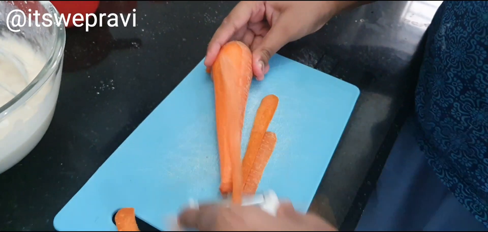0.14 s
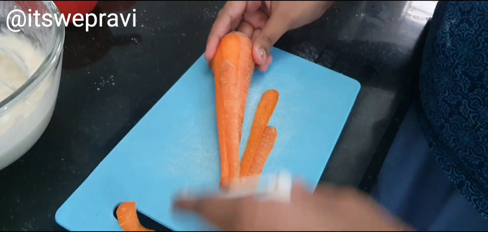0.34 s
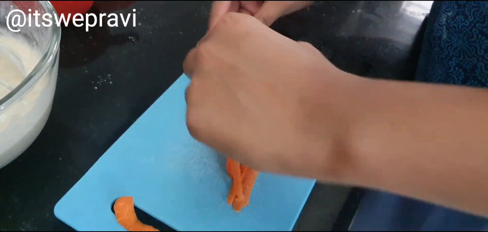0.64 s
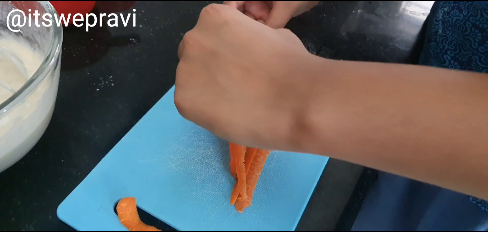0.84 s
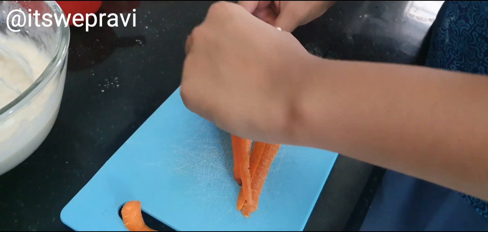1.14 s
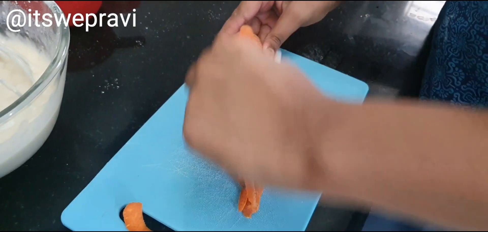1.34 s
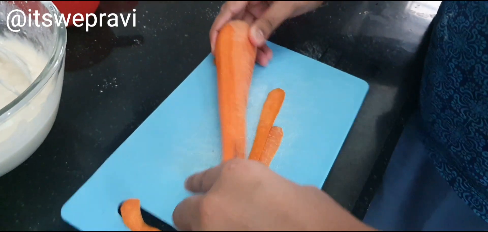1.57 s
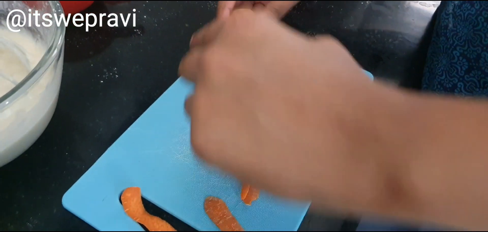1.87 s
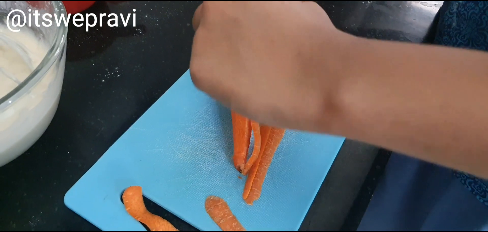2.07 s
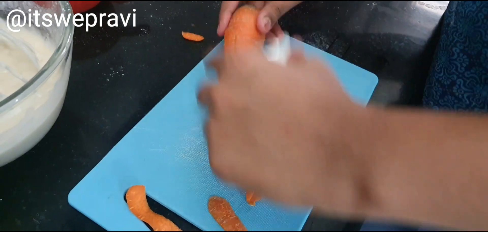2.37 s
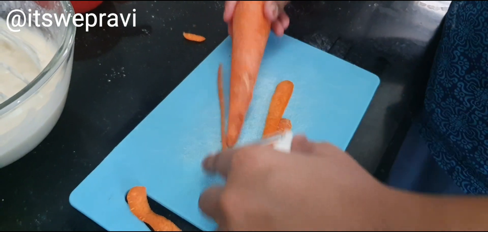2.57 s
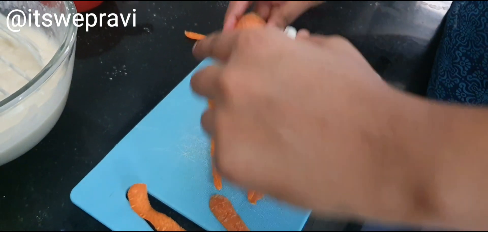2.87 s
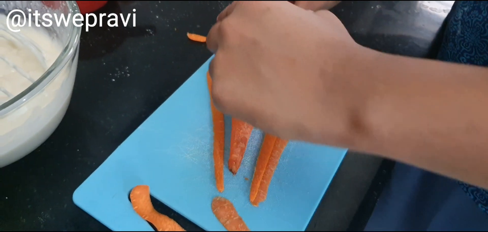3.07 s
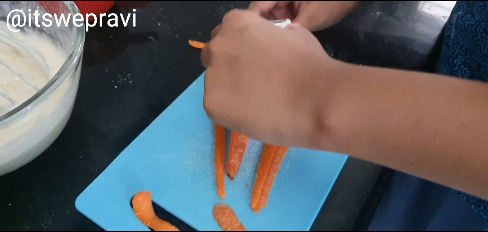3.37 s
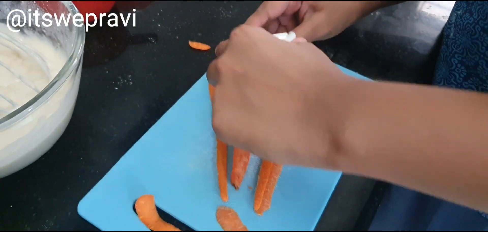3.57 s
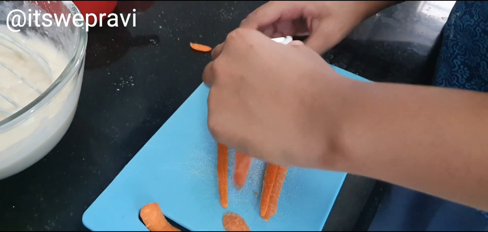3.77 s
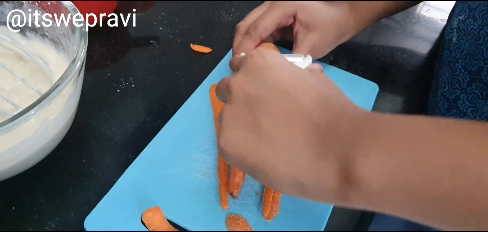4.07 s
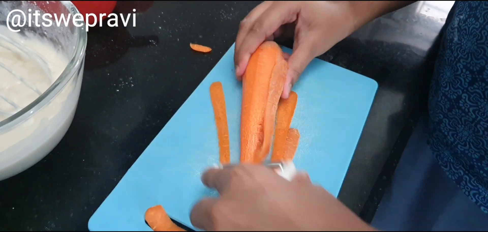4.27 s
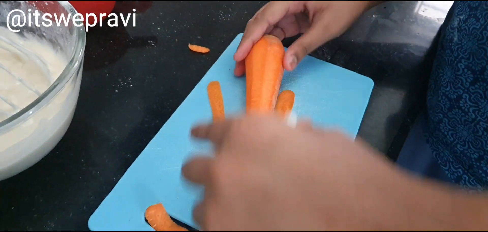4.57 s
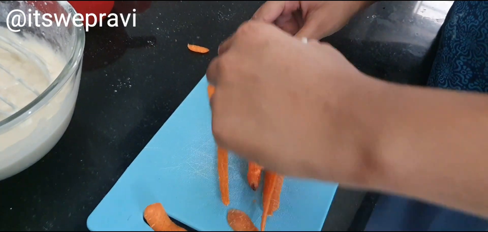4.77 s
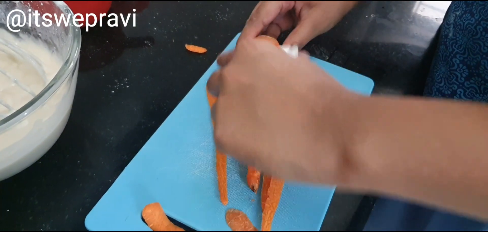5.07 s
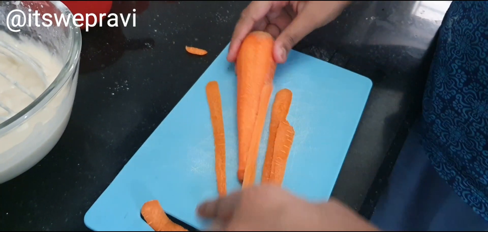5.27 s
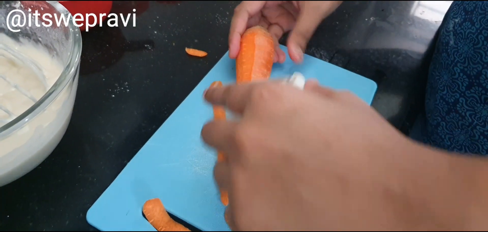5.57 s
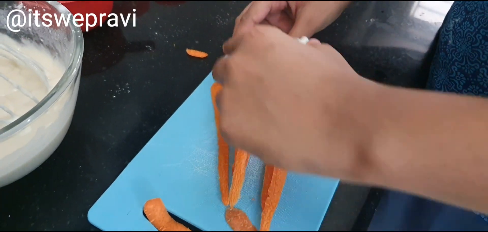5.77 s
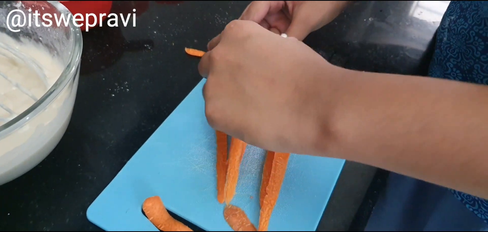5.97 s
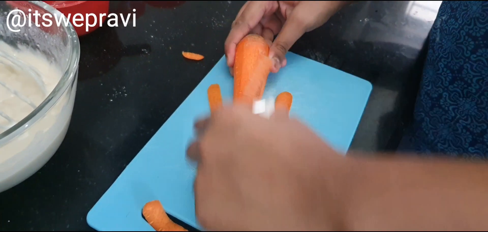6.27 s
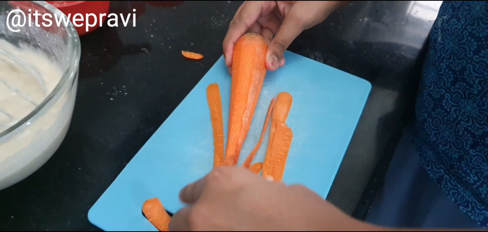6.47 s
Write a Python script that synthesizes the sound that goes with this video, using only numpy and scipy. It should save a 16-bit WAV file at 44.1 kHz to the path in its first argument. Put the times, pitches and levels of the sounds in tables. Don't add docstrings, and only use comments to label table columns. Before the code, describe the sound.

Close stereo pickup in a hard-surfaced kitchen with short, bright echo. A peeling stroke is already under way at 0 s, a crisp fibrous rasp that ends by 0.3 s in sharp edge catches and a skid on the plastic board. Metallic clacks of the loose blade cluster at 0.7-1.05 s. A second stroke swells from 1.2 to 1.55 s and scrapes off the tip until about 1.7 s. Small rattles, shifts and a dull bump fill 2.15-2.65 s; sparse clicks follow at 3.2-3.5 s, then very faint hand brushing to 3.9 s. A third rasp at 4.1-4.35 s finishes with hard snaps and a skid. Strong clacks at 4.92-4.95 s lead to a fourth stroke at 5.0-5.25 s, ending in a bright knock. Clacks at 5.9 s precede the last stroke, 6.15-6.4 s, and its brief skid. Faint creaks, wavering low rumble and hiss lie underneath.

```python
import sys
import numpy as np
from scipy import signal
from scipy.fft import rfft, irfft, next_fast_len
from scipy.io import wavfile
from scipy.ndimage import uniform_filter1d

SR = 44100
rng = np.random.default_rng(int(sys.argv[2]) if len(sys.argv) > 2 else 0)


def to_wav(sig):
    pcm = np.clip(np.atleast_2d(sig), -1, 1) * 32767
    pcm = np.round(pcm).astype(np.int16)
    wavfile.write(sys.argv[1], SR, pcm.T)


def to_linear_factor(level_db):
    exponent = np.asarray(level_db, float) / 20
    return 10 ** exponent


N = 292383

# (frequency [Hz], density [dB per Hz])
HISS_SPECTRUM = [(71, -31), (120, -4.5), (226, -12.5), (284, -12), (355, -14.5), (418, -16), (445, -15.5),
                 (684, -22.5), (1030, -30.5), (1430, -33.5), (1520, -33), (6630, -45), (7980, -32),
                 (10400, -49), (16000, -51.5)]
# (frequency [Hz], likeness [0-1])
HISS_LIKENESS = [(60, 0.74), (240, 0.85), (950, 0.28), (3770, 0.2), (15000, 0.4)]
# (time [s], level [dB])
RUMBLE_SWELL = [(0.0, -37), (0.03, -39.5), (1.02, -50), (1.46, -40.5), (1.73, -49.5), (3.21, -55.5),
                (3.25, -46.5), (3.78, -54), (4.21, -41.5), (4.56, -53.5), (5.22, -45), (5.28, -55),
                (5.69, -59), (5.72, -43), (6.02, -39.5), (6.15, -54), (6.26, -39), (6.63, -53.5)]
# (frequency [Hz], level [dB])
HOUSE_TONES = [(140, -67.5), (286, -63), (331, -65.5)]
# (frequency [Hz], time to fall 60 dB [s])
KITCHEN_DECAY = [(200, 1), (1000, 0.46), (3000, 0.59), (6000, 0.55), (12000, 0.38)]
# (frequency [Hz], gain [dB])
PORT_COLOUR = [(60, 5), (150, 2.5), (380, -2.5), (950, 2), (2380, 8.5), (5980, -3), (15000, -3)]
# (frequency [Hz], level [dB])
PORT_SPREAD = [(300, -19.5), (1000, -7), (3000, -5), (6000, 0.5), (12000, -3)]

# (frequency [Hz], width [Hz], level rubbed [dB], level knocked [dB])
RUMBLE_MODES = [(65, 8.9, -16.5, 0), (78.4, 15, 6, 4)]
THUD_MODES = [(140, 9, 1, 0), (310, 72, -7.5, 0)]
SKID_MODES = [(1230, 450, -1.1, 0), (2250, 400, -1.9, 0)]
BOARD_MODES = [(648, 180, -3, -5.5), (1096, 480, -4, -3.5), (1235, 120, -3.5, -2), (1736, 290, 0.5, -1),
               (2006, 251, 2.5, -9.5), (2237, 540, -2.5, -9.5)]
BLADE_MODES = [(2708, 144, -2.5, -3.5), (2892, 189, -1, -0.5), (3567, 500, -7, -5.5), (3865, 770, -9, -7.5)]
PIVOT_MODES = [(4526, 449, -1, -8.5), (4957, 310, 0, -5), (5325, 380, -3, -1.5), (6200, 1300, -10.5, -11)]
EDGE_MODES = [(6800, 700, -10, 1.5), (8680, 600, -7.5, 2.5), (9800, 440, -1.5, 2), (11100, 740, -0.5, -0.5),
              (12740, 760, -11, -9), (14640, 620, -9.5, -8.5), (14000, 800, -17.5, -9.5)]
GRIP_SHIFT = [2.4, 1.5, 2.8, 3.8]

# (time [s], level [dB], length [s])
BUMP_EVENTS = [(2.35, -43, 0.025), (.11, -40.5, 0.028), (5.05, -46.5, 0.027)]
# (start [s], end [s], frequency [Hz], level [dB])
CREAK_EVENTS = [(.12, 0.365, 424, -45.5), (1.434, 1.522, 310, -33.5), (2.471, 2.577, 695, -46.5),
                (4.421, 4.526, 588, -44), (5.309, 5.401, 547, -57)]
# (start [s], length [s], blade [dB], loss by the end [dB], board re blade [dB])
HAND_BRUSHES = [
    (3.55, .15, -63, 1.8, -5),
    (3.7, 0.052, -71.5, 9, 0),
    (3.81, .115, -58.5, 3.4, -2.5),
]
# (start [s], length [s], blade [dB], loss [dB], board re blade [dB])
BLADE_SHIFTS = [(.709, 0.056, -37, -3, -9.5), (.783, 0.11, -42.5, 18.5, -4), (.953, .047, -46, 31.5, -7),
                (1.029, 0.1, -30.5, 25, -17), (2.157, 0.097, -59, 18, -2), (2.325, 0.092, -48, .6, -2),
                (2.423, 0.024, -25.5, 11, -11.5), (2.449, 0.11, -42, 4, -14),
                (2.575, 0.033, -41, -10.5, -2.5), (2.615, 0.046, -33, 21.5, -4.5),
                (3.2, 0.031, -73, -7, -13), (3.228, 0.089, -35, 33, -18), (3.44, 0.048, -60, -30, -8),
                (3.48, 0.067, -34.5, 29, -5), (3.93, 0.062, -39.5, 12, 1), (3.996, 0.08, -48, -3, -4.5),
                (4.923, 0.11, -40, 3, -8), (5.6, 0.055, -63.5, 7.5, 0.5), (5.902, 0.039, -41, -6, -28),
                (5.93, 0.18, -36, 32.5, -12)]
# (start [s], length [s], blade [dB], loss [dB], board re blade [dB])
BLADE_SKIDS = [(.1, 0.12, -22, 3, 4), (.224, 0.048, -29, 18, -1), (1.55, 0.17, -35.5, 2.1, 3),
               (1.635, 0.089, -44, 27.5, 1.7), (4.35, 0.078, -30, -1.5, 6), (4.44, 0.045, -29, 26.5, -7),
               (5.228, 0.015, -37, -8, -1), (5.248, 0.054, -22.5, 24, -8.5), (6.417, 0.13, -29, 40, 4)]
# (start [s], fullest [s], end [s], blade at fullest [dB], loss by the end [dB])
PEEL_STROKES = [
    (-.06, 0.063, .1, -25, -4.5),
    (1.211, 1.425, 1.548, -23, 22.5),
    (4.088, 4.257, 4.348, -25.5, 12),
    (5.014, 5.124, 5.226, -27.5, 11.5),
    (6.145, 6.31, 6.417, -26, 7.5),
]
# (time [s], length [s], loss [dB])
BLADE_STALLS = [(0.131, 0.019, 4.5), (0.159, 0.01, 3), (1.387, 0.024, 3.5), (4.375, 0.029, 3)]
# (time [s], blade peak [dB], pivot re blade [dB])
BLADE_CLACKS = [(0.7088, -16.5, 9), (0.7358, -18, -8), (0.759, -18, 6.5), (0.7651, -19.5, 8),
                (0.7842, -20.5, 8.5), (0.954, -36.5, 7), (1.024, -23.5, 11), (1.0287, -17, -7),
                (1.0358, -10, 1.5), (1.5853, -14, 2.5), (2.3263, -40, -8), (2.3449, -22, 2.5),
                (2.3652, -27.5, 7), (2.395, -51, 23), (2.4198, -34, 12), (2.4231, -18, 11.5),
                (2.427, -22, 7), (2.429, -23.5, 14.5), (3.2068, -35.5, -5), (3.228, -28, 14.5),
                (3.248, -20, -10), (3.9292, -23, -2), (3.9635, -29, 2), (4.9234, -18, 2.5),
                (4.9332, -13, 7), (4.9491, -9.5, 2), (5.2484, -8.5, 6.5), (5.9018, -22, 0),
                (5.9055, -12.5, 7), (6.5343, -30.5, 8)]
# (time [s], blade peak [dB], board re blade [dB])
EDGE_CATCHES = [(0.099, -19, 6), (0.1379, -5, -13.5), (0.17, -11, -3), (0.1987, -10.5, -7.5),
                (0.2086, -8.5, -8.5), (.7729, -19.5, -2), (1.2093, -26, -2), (1.2368, -30, -11),
                (1.5617, -20.5, 2), (1.6066, -16.5, -6), (2.159, -41, -14), (2.5705, -33, 6),
                (2.583, -20.5, -14), (2.618, -22, -18), (3.46, -31.5, -6), (3.48, -30, -2),
                (4.11, -27.5, 0.5), (4.364, -19, -4), (4.376, -6, -5), (4.3846, -11.5, -17.5),
                (4.4134, -10, -22), (4.4428, -16, -13), (5.0478, -22.5, -3), (5.228, -28, -16.5),
                (5.2423, -24.5, 14), (6.1548, -37, -3), (6.3753, -26.5, 10)]
# (time [s], blade peak [dB])
LIGHT_TAPS = [(0.996, -47), (2.3146, -47), (2.603, -23.5), (3.1756, -54), (3.897, -35), (4.0421, -33.5),
              (4.0904, -27), (4.355, -21.5), (6.3537, -20), (6.4272, -19.5)]


def rms_one(x):
    return x / np.sqrt(np.mean(x ** 2) + 1e-20)


def at_hz(points, hz):
    p = np.array(points, float)
    return np.interp(np.log(np.maximum(hz, 1)), np.log(np.maximum(p[:, 0], 1)), p[:, 1])


def bandpass(x, low_hz, high_hz):
    return signal.sosfilt(signal.butter(2, [low_hz, high_hz], "band", fs=SR, output="sos"), x)


def drift(rate_hz):
    r = np.exp(-16 * np.pi * rate_hz / SR)
    noise = rng.standard_normal(N // 8 + 4002)
    slow = rms_one(signal.lfilter([1], [1, -2 * r, r * r], noise)[4000:])
    return np.interp(np.arange(N) / 8, np.arange(len(slow)), slow)


def tone(hz, wander_hz):
    return np.sqrt(2) * np.sin(2 * np.pi * np.cumsum(hz + wander_hz * drift(3.0)) / SR)


def resonate(rub, modes, patchy_db, knock=0):
    out, reply = 0, 0
    click = np.arange(SR // 2) == 0
    for k, (hz, width_hz, rub_db, knock_db) in enumerate(modes):
        r = np.exp(-np.pi * max(width_hz, 5) / SR)
        b = (-1) ** k * (1 - r * r) * np.array([1, 0, -1])
        a = [1, -2 * r * np.cos(2 * np.pi * hz / SR), r * r]
        shift_db = patchy_db * drift(10.9) if patchy_db else 0
        force = rub * to_linear_factor(rub_db + shift_db) + knock * to_linear_factor(knock_db)
        out = out + signal.lfilter(b, a, force + 1e-18)
        reply = reply + to_linear_factor(rub_db) * signal.lfilter(b, a, click)
    return out / np.sqrt(np.sum(reply ** 2))


def hiss():
    hz = np.arange(N // 2 + 1) * SR / N
    alike = np.clip(at_hz(HISS_LIKENESS, hz), 0, 1)
    colour = to_linear_factor(at_hz(HISS_SPECTRUM, np.maximum(hz, 130)))
    mid, side = rfft(rng.standard_normal((2, N))) * colour
    both = np.sqrt(1 + alike) * mid + np.sqrt(1 - alike) * side * [[1], [-1]]
    both = both / np.sqrt(1 + (90 / (hz + 1)) ** 6)
    return to_linear_factor(-52.5) * rms_one(irfft(both, N))


def house_rumble():
    mid, side = resonate(rng.standard_normal((2, N)), RUMBLE_MODES, patchy_db=2.0)
    mid, side = bandpass([mid, side], 45, 130)
    mid = rms_one(mid / uniform_filter1d(mid ** 2 + 1e-9, size=4000) ** 0.84)
    mid = mid + to_linear_factor(-1.5 + 2.2 * drift(4.6)) * tone(79.9, wander_hz=2.5)
    swell = to_linear_factor(np.interp(np.arange(N) / SR, *np.transpose(RUMBLE_SWELL)))
    return swell * rms_one(mid + .25 * side * np.array([[1], [-1]]))


def house_tones():
    tones = sum(to_linear_factor(db + 2.2 * drift(2.8)) * tone(hz, 3.0) for hz, db in HOUSE_TONES)
    air = bandpass(rng.standard_normal((2, N)), 18, 45)
    return tones + to_linear_factor(-70) * rms_one(air)


def room_noise():
    return (house_tones() + house_rumble() + hiss()) * to_linear_factor([[.8], [-.8]])


def kitchen(x):
    t = np.arange(int(.8 * SR)) / SR
    edges = 100 * 2 ** np.arange(0, 7.6, .5)
    tail = 0
    white = rng.standard_normal((2, 2, len(t)))
    for k, (low, high) in enumerate(zip(edges, edges[1:])):
        decay = to_linear_factor(-60 * t / at_hz(KITCHEN_DECAY, np.sqrt(low * high)))
        tail = tail + bandpass(white[k % 2], low, high) * decay
    tail = tail + to_linear_factor(13.5) * white[0] * np.exp(-t / 0.017)
    tail = tail * np.clip(t / 0.00081, 0, 1)
    return signal.fftconvolve(x[None], tail / np.sqrt(np.sum(tail ** 2) / 2), axes=1)[:, :N]


def ports(pair, pan_db):
    size = next_fast_len(N + 4096)
    hz = np.arange(size // 2 + 1) * SR / size
    lag_s = 5e-5
    shared, own = rfft(pair, size)
    own = own * to_linear_factor(at_hz(PORT_SPREAD, hz))
    half = to_linear_factor(at_hz(PORT_COLOUR, hz) / 2) * np.exp(1j * np.pi * hz * lag_s)
    place = to_linear_factor((uniform_filter1d(pan_db, size=200) - 1.5) / 2)
    left = irfft((shared + own) * half, size)[:N] * place
    right = irfft((shared - own) / half, size)[:N] / place
    return np.array([left, right])


def bumps():
    t = np.arange(N) / SR
    swell = sum(to_linear_factor(db) * np.exp(-((t - s) / length) ** 2) for s, db, length in BUMP_EVENTS)
    return swell * rms_one(bandpass(rng.standard_normal(N), 110, 380))


def creaks():
    out = np.zeros(N)
    for start, end, hz, level_db in CREAK_EVENTS:
        swell = np.hanning(int((end - start) * SR)) ** .5
        rub = swell * rng.standard_normal(len(swell))
        ring = resonate(rub, [(hz, 35, 0, 0)], patchy_db=0)
        out[int(start * SR):int(start * SR) + len(swell)] += to_linear_factor(level_db) * ring
    return out


def board_thud(board_push):
    pressure = np.abs(uniform_filter1d(board_push, size=1500)) ** 0.51
    return to_linear_factor(-27.0) * resonate(pressure * rng.standard_normal(N), THUD_MODES, patchy_db=3.0)


def plastic_skid(slide, fibres):
    on_board = np.clip(slide[0] / (slide[1] + 1e-9), 0, 3.0)
    return to_linear_factor(-9) * resonate(slide[0] * on_board * fibres, SKID_MODES, patchy_db=-1.0)


def contact(start, length):
    on = np.arange(max(int(start * SR), 0), min(int((start + length) * SR), N))
    return on, (on / SR - start) / length


def strokes():
    push, pan_db = np.zeros((4, N)), np.zeros(N)

    def add(on, blade_db, board_db, edge_db, side_db):
        fade = np.clip((on[-1] - on) / SR / .002, 0, 1)
        for part, db in enumerate([board_db, -3, -3, edge_db]):
            push[part, on] = fade * to_linear_factor(blade_db + db)
        pan_db[on] = side_db

    # contacts, edge re blade [dB], left over right [dB]
    for rows, edge_db, side_db in [(BLADE_SHIFTS, -6.5, 3), (HAND_BRUSHES, -1, 6), (BLADE_SKIDS, -6.5, 5)]:
        for start, length, db, lost_db, board_db in rows:
            on, along = contact(start, length)
            add(on, db - lost_db * along, board_db, edge_db, side_db)

    for start, fullest, end, db, lost_db in PEEL_STROKES:
        on, along = contact(start, end - start)
        top = (fullest - start) / (end - start)
        bite_db = 19.5 * np.clip(1 - along / top, 0, 1) ** 3.3
        lift_db = lost_db * np.clip((along - top) / (1 - top), 0, 1) ** 2.3
        board_db = -8 + 6.9 * along
        edge_db = -3.5 - 2 * along
        side_db = 1.5 + 3.6 * along
        add(on, db - bite_db - lift_db, board_db, edge_db, side_db)

    for s, length, lost_db in BLADE_STALLS:
        push = push * to_linear_factor(-lost_db * np.exp(-((np.arange(N) / SR - s) / length) ** 2))
    return push, pan_db


def knocks():
    push, t = np.zeros((4, N)), np.arange(int(.04 * SR)) / SR
    rows = [(s, db, -7.5, pivot_db, -8 + 0.81 * pivot_db, 2.29) for s, db, pivot_db in BLADE_CLACKS]
    rows += [(s, db, board_db, -14, -12.5, 2.7) for s, db, board_db in EDGE_CATCHES]
    rows += [(s, db, -4, 3, -6.5, 3.7) for s, db in LIGHT_TAPS]
    for s, peak_db, board_db, pivot_db, edge_db, ms in rows:
        rattle = np.exp(-t * 1000 / ms) * to_linear_factor(peak_db - 4.5)
        start = int(s * SR)
        push[:, start:start + len(t)] += rattle * to_linear_factor([[board_db], [0], [pivot_db], [edge_db]])
    return push


def tearing(per_s, spread_db, clumps):
    sizes = to_linear_factor(spread_db * np.minimum(rng.exponential(1, (2, N)), 4))
    signs = rng.choice([-1, 1], (2, N))
    snaps = rng.random((2, N)) < per_s / SR
    return rms_one(sizes * signs * snaps * clumps)


def peeler():
    slide, pan_db = strokes()
    hits = knocks()
    clumps = to_linear_factor(1.7 * drift(40) + 1.6 * drift(250))
    fibres = tearing(4000, 4.0, clumps)
    chatter = np.sign(rng.standard_normal((2, N)))
    sound = 0
    for part, modes in enumerate([BOARD_MODES, BLADE_MODES, PIVOT_MODES, EDGE_MODES]):
        own = np.roll(fibres, 9001 * (part + 1), axis=1)
        rub = slide[part] * (0.5 * fibres + 0.69 * own)
        sound = sound + resonate(rub, modes, patchy_db=GRIP_SHIFT[part], knock=hits[part] * chatter)
    bare = to_linear_factor(-14.5) * hits[1] * chatter + to_linear_factor(-14) * slide[1] * fibres
    sound = sound + bandpass(bare, 900, 12000)
    sound = sound + plastic_skid(slide, fibres)
    sound[0] += board_thud(slide[0]) + creaks()
    return sound, pan_db


def scene():
    sound, pan_db = peeler()
    airborne = signal.sosfilt(signal.butter(2, 450, "high", fs=SR, output="sos"), sound[0])
    return ports(sound, pan_db) + to_linear_factor(-1) * kitchen(airborne) + room_noise() + bumps()


def band_limit(x):
    return signal.sosfilt(signal.butter(12, 16660, fs=SR, output="sos"), x)


def record(dry):
    clipped = np.clip(dry, -1, 1)
    mix = signal.sosfilt(signal.cheby2(10, 28, 16100, fs=SR, output="sos"), clipped)
    return band_limit(mix)


dry = scene()
out = record(dry)
to_wav(out)
```